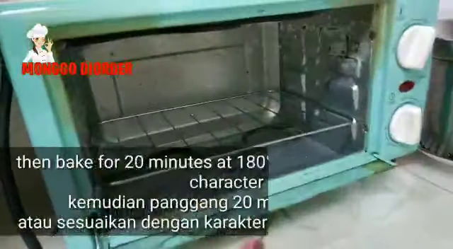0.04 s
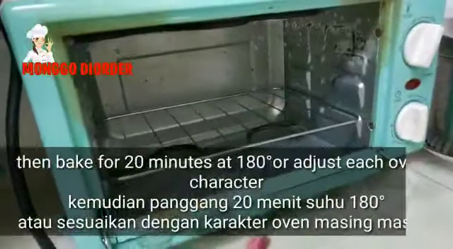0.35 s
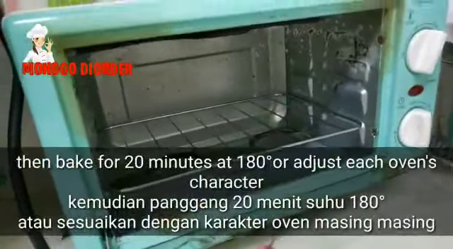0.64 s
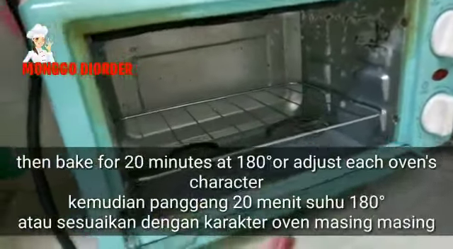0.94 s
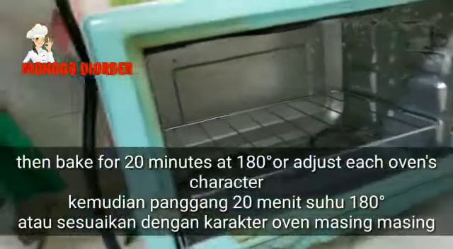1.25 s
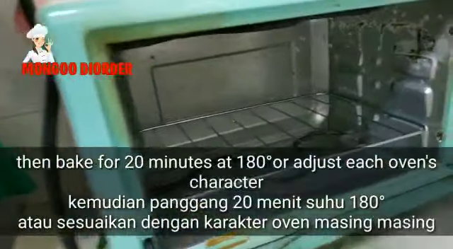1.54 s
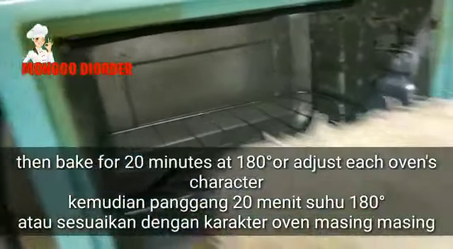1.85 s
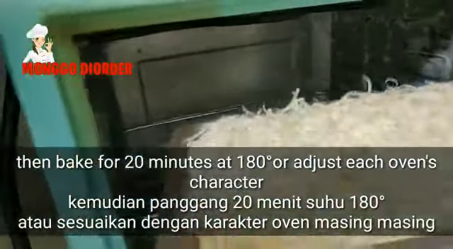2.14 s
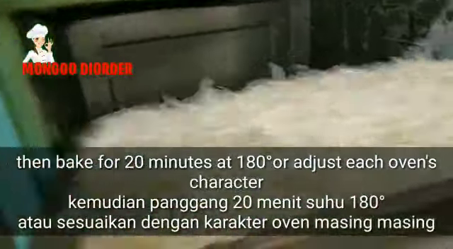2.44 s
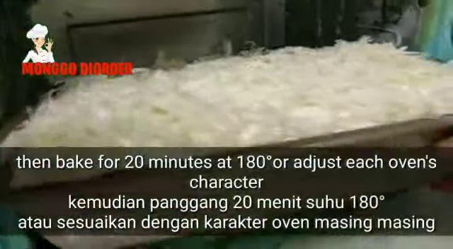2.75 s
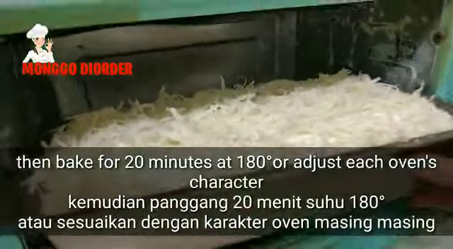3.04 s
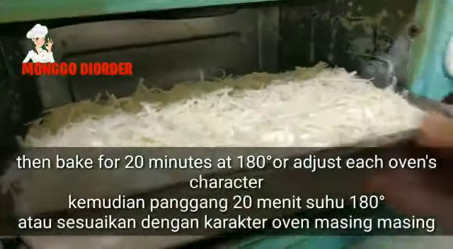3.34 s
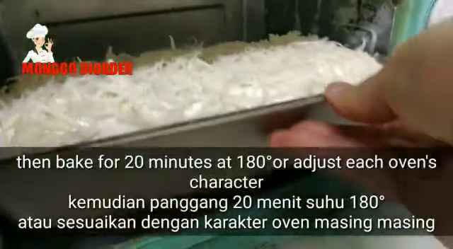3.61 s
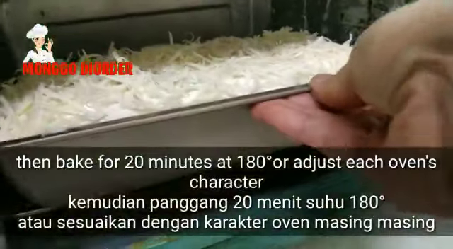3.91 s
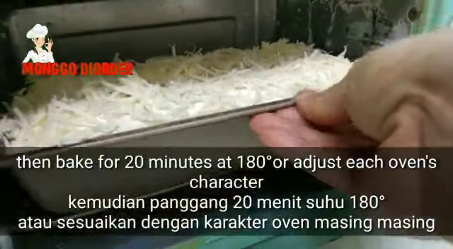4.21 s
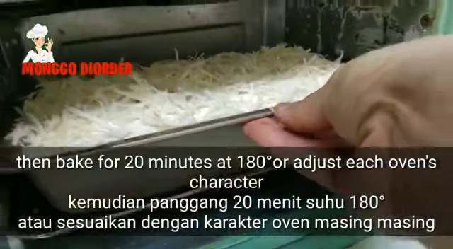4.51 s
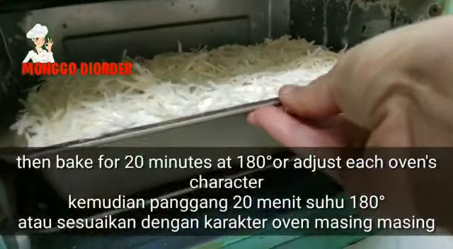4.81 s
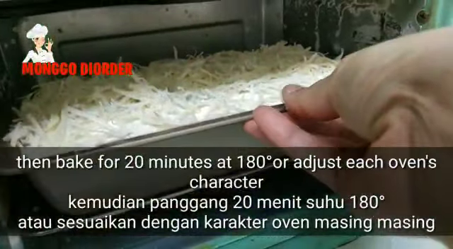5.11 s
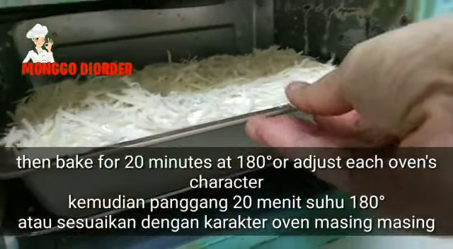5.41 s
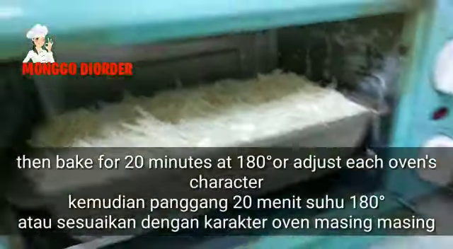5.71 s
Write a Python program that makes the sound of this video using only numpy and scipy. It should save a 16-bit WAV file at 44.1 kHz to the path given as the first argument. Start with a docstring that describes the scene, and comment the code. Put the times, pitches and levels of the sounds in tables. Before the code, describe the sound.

Close to a small oven in a quiet, humming kitchen, thin metal rings as the rack shifts and the glass door clacks. A loaded baking pan then knocks against the sill and scrapes across the wire rack, its base flexing in short low notes. The pan is eased deeper with light taps and soft scrapes, fingers slip off the rim, and the door gives one faint click.

```python
"""A wire rack knocks and slides in a sheet-steel shell, and a glass door clacks: a small toaster oven
stands open in a kitchen, close to a phone's two microphones. A filled metal baking pan bumps the sill
and the rack, scrapes in over the wires and is nudged into place, its floor flexing in short low notes.
Each contact rings the thin metal and the oven cavity; scraping is a run of tiny slips. After the pan's
light taps, fingers brush off the rim and the door gives one faint click, over a low kitchen hum."""
import sys
import numpy as np
from scipy import signal
from scipy.fft import irfft
from scipy.io import wavfile

SR = 44100
rng = np.random.default_rng(int(sys.argv[2]) if len(sys.argv) > 2 else 0)


def transcribe(signal):
    """Save signal, clipped to [-1, 1], as a 16-bit WAV file at the path in sys.argv[1]."""
    frames = np.atleast_2d(signal).T
    limited = np.clip(frames, -1, 1)
    pcm = np.round(limited * 32767).astype(np.int16)
    wavfile.write(sys.argv[1], SR, pcm)


N = 262836
TIME = np.arange(N) / SR
RING_TIME = TIME[:18000]  # the span of one blow's ring
EDGES_HZ = [0, 450, 1200, 3000, 7000, 22050]  # five ranges: thump, body, clack, clang, tick
CAVITY = rng.standard_normal(400)  # uneven heights of the cavity's resonances, the same for every contact

# modes of the oven's steel shell: f/Hz, level/dB, t60/s
OVEN_MODES = [(215, 4.5, 0.53), (245, 9.5, 0.16), (335, -7.5, 0.24), (379, -1, 0.4), (463, 1, 0.63),
              (524, -14, 0.3), (530, 1, 0.27), (730, 8, 0.13), (757, -1.5, 0.45), (1050, 5, 0.15),
              (1332, -2.5, 0.22), (1820, -10, 0.18)]
# modes of the baking pan: f/Hz, level/dB, t60/s
PAN_MODES = [(205, 7.5, 0.28), (253, 1.5, 0.26), (307.5, 6, 0.32), (391, -13, 0.14), (574, 3, 0.18),
             (735, 6.5, 0.33), (862, 4.5, 0.28), (1203, -5, 0.43), (1820, 0, 0.19), (1946, 0, 0.16),
             (2366, -8, 0.14), (3150, -19, 0.13), (5430, -11, 0.13), (6000, -12, 0.12), (6900, -9, 0.12)]


def loading():
    """The pan bumps the sill and the rack and rattles in over the wires in shoves that grow weaker."""
    # the base on the sill: t/s, level/dB, thump/dB, hardness/(dB per range), thump/Hz, panel/Hz, t60/s
    sill_bumps = [(2.3625, -21.5, -3.5, -5.5, 215, 830, 0.076)]
    # the pan on the rack: same columns
    rack_bumps = [(2.106, -36, 1.5, 1.5, 332, 1255, 0.26), (2.114, -30.5, -0.5, -4, 205, 1264, 0.19),
                  (2.506, -31, 8.5, 1.5, 289, 534, 0.082), (2.533, -26, 4, -2.5, 316, 1254, 0.066),
                  (2.55, -30, -1, -6, 205, 735, 0.081), (2.564, -36, 14.5, 3.5, 310, 840, 0.075),
                  (2.576, -33, -5, -4, 303, 1150, 0.05), (2.603, -32, 6, -3.5, 306, 1180, 0.066),
                  (2.626, -27, 1.5, -3.5, 396, 640, 0.25), (2.6865, -29.5, 1.5, -1.5, 191, 496, 0.11),
                  (2.765, -29, 4, -1, 227, 1350, 0.078), (2.802, -29, 5, -3, 215, 1265, 0.13)]
    # shoves that scrape the rim in: t/s, length/s, level/dB, brightness/(dB per range)
    shoves = [(2.508, 0.11, -21.5, 5), (2.69, 0.025, -27.5, -1), (2.775, 0.05, -31, -1),
              (2.85, 0.2, -37, -3)]
    motion = chatter(effort(shoves, sag_db_per_s=27, release_db_per_s=180, dulling=0.53))
    scrape = slide(motion, pan, t60=0.056, slips_per_s=1100, scatter_db=2, thump_db=0.5, modes_db=-18.5)
    grit = rasp(motion)
    clank = knocks(sill_bumps, sill, struck_db=(1, -4), treble_db=(-0.5, -2, -3), gain_db=0.3)
    bumps = knocks(rack_bumps, pan, struck_db=(4, -2), treble_db=(4.5, 2, -2), gain_db=-0.56)
    return clank + bumps + scrape + grit


def rack():
    """The wire rack slides on its runners and knocks against the steel shell."""
    # rack on shell: t/s, level/dB, thump/dB, hardness/(dB per range), thump/Hz, panel/Hz, t60/s
    blows = [(0.002, -29, -8, -2, 215, 760, 0.14), (0.1506, -20.5, -5.5, -0.5, 378, 730, 0.12),
             (0.2205, -22, -5, -2.5, 394, 754, 0.16)]
    # strokes of the sliding rack: t/s, length/s, level/dB, brightness/(dB per range)
    strokes = [(0, 0.28, -25, 0), (.48, 0.16, -38.5, -5.5), (.995, 0.0098, -43, -3.5)]
    motion = effort(strokes, sag_db_per_s=28.5, release_db_per_s=188, dulling=0.43)
    scrape = slide(motion, oven, t60=0.081, slips_per_s=700, scatter_db=4, thump_db=-4.5, modes_db=-17)
    return scrape + knocks(blows, oven, struck_db=(-4, -2.5), treble_db=(-7.5, -7.5, -5.5), gain_db=0.5)


def door_clacks():
    """The glass door meets its stop and settles: each clack is one swing of the pane, then a ring."""
    # clacks: t/s, level/dB, thump/dB, hardness/(dB per range), thump/Hz, panel/Hz, t60/s, slap/dB re level
    clacks = [(0.4499, -23, -9, -1, 245, 785, 0.071, 17), (0.4737, -29.5, -6, 0, 338, 850, 0.14, -2),
              (0.546, -39, -6, -3.5, 288, 520, 0.064, -6), (0.642, -35, -2.5, -3, 244, 992, 0.08, 0.5),
              (1.0422, -28, -3.5, -3, 224, 580, 0.062, 16.5)]
    slaps = sum(swing(t, db + slap_db, hz=850, peak_s=0.00043) for t, db, *_, slap_db in clacks)
    blows = [row[:-1] for row in clacks]
    frame = knocks(blows, door, struck_db=(-3.5, 1), treble_db=(-4, -14.5, -14), gain_db=1.3)
    return small_panel(slaps) + frame


def flexing():
    """The pan's floor bends as its weight shifts; the filling damps each low note quickly."""
    # bends of the loaded floor: t/s, level/dB, f/Hz, time to peak/s
    flexes = [(2.698, -24, 204, 0.024), (2.968, -38, 278, 0.012), (3.015, -32, 282, 0.022),
              (3.106, -21.5, 310, 0.012), (3.178, -34.5, 322, 0.019), (4.025, -34, 287, 0.01),
              (4.555, -36.5, 291, 0.015), (4.615, -38, 323, 0.013)]
    return sum(swing(*row) for row in flexes)


def settling():
    """Small pushes and light taps of the seated pan, then one faint click of the door."""
    # the pan's taps and, in the last row, the door's click:
    # t/s, level/dB, thump/dB, hardness/(dB per range), thump/Hz
    contacts = [(2.985, -44.5, 10, -0.5, 284.5), (3.11, -38.5, 4, -7, 312), (3.351, -42, 10, -7.5, 270),
                (3.374, -65, 26, 2, 203), (3.439, -53.5, 10, 2.5, 261), (3.498, -42, 7, -1, 236),
                (3.556, -57.5, 1, 0.5, 245), (3.659, -49, 8.5, -3.5, 258), (3.962, -41, 2, -6, 262),
                (4.011, -56, 9, 3, 292), (4.029, -47.5, 8.5, -6.5, 277), (4.3534, -36, 2.5, -4.5, 245),
                (4.56, -46.5, 4, -8, 283), (5.2311, -38, -1, -1, 233), (5.789, -60, -12, -1, 253)]
    # pushes that move the pan deeper: t/s, length/s, level/dB, brightness/(dB per range)
    pushes = [(2.99, 0.1, -41, 1), (3.45, 0.11, -44.5, -1.5), (3.67, 0.41, -42.5, -0.5),
              (3.82, 0.012, -37, 0), (3.96, 0.072, -40.5, -2), (4.41, 0.057, -40, -1.5),
              (4.575, 0.022, -45, -0.5)]
    panel_hz, contact_t60 = 536, 0.16
    blows = [(*row, panel_hz, contact_t60) for row in contacts]
    motion = effort(pushes, sag_db_per_s=6, release_db_per_s=159, dulling=0.055)
    creep = slide(motion, seated_pan, t60=0.18, slips_per_s=150, scatter_db=2.5, thump_db=0, modes_db=-24)
    return creep + knocks(blows, seated_pan, struck_db=(1.5, -26), treble_db=(3, -0.5, -2), gain_db=-0.4)


def wire_pings():
    """A rack wire snaps into its slot: a bright tick, then its bunched modes."""
    # snaps: t/s, level/dB, brightness/(dB per octave), ring length/ratio
    snaps = [(0.481, -36.5, 4.5, 1.3), (0.6044, -31, 0.5, 1.1)]
    # bunches of close modes in the wire: f/Hz, width/Hz, level/dB, t60/s
    bunches = [(2860, 150, -6, 0.11), (3700, 95, -14, 0.23), (5250, 110, -2.5, 0.071),
               (6740, 490, -6, 0.09), (7560, 270, -9, 0.11), (9240, 300, 3, 0.078),
               (11000, 550, -7.5, 0.17), (12600, 600, -1, 0.081), (13800, 980, -5, 0.13),
               (15100, 600, -14, .12)]
    out = np.zeros((2, N))
    for t, db, bright, length in snaps:
        ping = sum(undb(mode_db + bright * np.log2(hz / 9000)) * fade(length * t60) * shimmer(hz, width)
                   for hz, width, mode_db, t60 in bunches)
        ping += undb(13) * fade(0.0077) * shimmer(centre_hz=17500, width_hz=6900)  # the tick
        attack_rms = np.std(ping[:, :SR // 50])
        add_at(out, t, undb(db) * ping / attack_rms)
    return out


def wire_rings():
    """Many near-equal wires keep ringing together after a blow."""
    # ringing clusters of wires: t/s, level/dB, f/Hz, width/Hz, t60/s
    clusters = [(.002, -40.5, 3720, 695, 0.93), (.1505, -33.5, 3650, 850, 0.61), (2.114, -51, 4360, 70, 1),
                (2.114, -42, 12400, 700, 0.31), (2.114, -33, 1590, 1490, 0.71),
                (2.113, -38.5, 866, 40, 0.81), (5.2326, -37, 3360, 493, 0.17), (5.786, -51, 2950, 110, 0.1)]
    out = np.zeros((2, N))
    for t, db, hz, width, t60 in clusters:
        add_at(out, t, undb(db) * fade(t60) * shimmer(hz, width))
    return out


def pan(t60, struck=(), modes_db=-13):
    """Response of the filled pan lying on the rack."""
    # the pan's crowd of weak modes: f/Hz, level/dB
    spectrum = [(30, -50), (105, -33), (200, 0), (310, -2.5), (450, -8), (850, -5.5), (1250, -6),
                (1550, -12), (1900, -14), (2800, -15.5), (4000, -18.5), (6500, -26), (11000, -30),
                (16000, -39)]
    modes = [(hz, db + modes_db, decay) for hz, db, decay in PAN_MODES] + list(struck)
    return ring(spectrum, modes, t60, tail_db=-5.5, tail_t60=0.52,
                crack_db=-26, damping=0.83, ripple_db=4.5, rise_s=0.00079)


def sill(t60, struck=(), modes_db=-22):
    """Response of the pan's loaded base on the sill: a short, hollow clank."""
    # the base's crowd of weak modes: f/Hz, level/dB
    spectrum = [(30, -46), (100, -33), (200, -1.5), (310, 3.5), (450, -9), (620, -8.5), (830, 1),
                (1020, -1.5), (1350, -8), (2220, -19), (2520, -19.5), (4020, -20), (5900, -30),
                (11900, -32), (16000, -45)]
    modes = [(hz, db + modes_db, decay) for hz, db, decay in PAN_MODES] + list(struck)
    return ring(spectrum, modes, t60, tail_db=-2.5, tail_t60=0.38,
                crack_db=-17, damping=0.94, ripple_db=1.5, rise_s=0.0005)


def seated_pan(t60, struck=(), modes_db=-27):
    """Lying with its full weight on the rack, the pan is duller and rings less."""
    # the seated pan's crowd of weak modes: f/Hz, level/dB
    spectrum = [(30, -25), (110, -39), (200, 1), (290, 4.5), (370, -6.5), (520, -3), (680, -10),
                (1100, -7.5), (2000, -14), (2500, -16.5), (3400, -17.5), (4700, -25.5), (6500, -26.5),
                (9000, -21), (16000, -33)]
    modes = [(hz, db + modes_db, decay) for hz, db, decay in PAN_MODES] + list(struck)
    return ring(spectrum, modes, t60, tail_db=-19.5, tail_t60=0.92,
                crack_db=-38, damping=0.88, ripple_db=4.5, rise_s=0.00046)


def oven(t60, struck=(), modes_db=-15):
    """Response of the oven shell; a well damped contact also shortens its modes and its tail."""
    # the shell's crowd of weak modes: f/Hz, level/dB
    spectrum = [(30, -47), (110, -9), (215, -3.5), (400, -3), (620, -7.5), (740, -7.5), (1100, -9.5),
                (1400, -12), (1900, -12.5), (2800, -18.5), (3800, -15.5), (5400, -22.5), (8700, -19.5),
                (11500, -30), (16000, -28.5)]
    tail_t60 = 3.94 * t60
    modes = [(hz, db + modes_db, min(decay, tail_t60)) for hz, db, decay in OVEN_MODES] + list(struck)
    return ring(spectrum, modes, t60, tail_db=-7.5, tail_t60=tail_t60,
                crack_db=-4, damping=0.8, ripple_db=2.5, rise_s=0.00029)


def door(t60, struck=(), modes_db=-22):
    """Response of the framed glass door, with the shell ringing faintly behind it."""
    # the door's crowd of weak modes: f/Hz, level/dB
    spectrum = [(30, -50), (100, -19), (195, 6), (450, 2), (580, 5), (690, -20), (900, 3.5), (1170, -13.5),
                (1760, -16), (2300, -24), (3000, -26.5), (3900, -30), (4470, -28.5), (6560, -36),
                (12700, -34), (16000, -53)]
    modes = [(hz, db + modes_db, min(decay, 3 * t60)) for hz, db, decay in OVEN_MODES] + list(struck)
    return ring(spectrum, modes, t60, tail_db=-14, tail_t60=5.6 * t60,
                crack_db=-6, damping=1, ripple_db=2, rise_s=0.00059)


def knocks(blows, body, struck_db, treble_db, gain_db):
    """Blows on a body: weight sets the thump, hardness tilts the treble, the spot hit picks two modes."""
    thump_mode_db, panel_mode_db = struck_db
    out = np.zeros((2, N))
    for t, db, thump_db, hardness, thump_hz, panel_hz, t60 in blows:
        ranges = body(t60, [(thump_hz, thump_mode_db, 1.03 * t60), (panel_hz, panel_mode_db, t60)])
        attack_rms = np.sqrt(np.mean(ranges[..., :SR // 33] ** 2, axis=(1, 2)))
        tilted_db = np.array(treble_db) + hardness * np.arange(1, 4)  # clack, clang, tick
        gains = undb(db + np.array([thump_db, 0, *tilted_db])) / attack_rms
        add_at(out, t, np.tensordot(gains, ranges, 1))
    return undb(gain_db) * out


def effort(strokes, sag_db_per_s, release_db_per_s, dulling, attack_s=0.0047):
    """Level and brightness of a slide in dB: each stroke bites, slows and lets go, duller as it weakens."""
    db, bright = np.full(N, -np.inf), np.zeros(N)
    for t, length, peak_db, peak_bright in strokes:
        age = TIME - t
        rise = 20 * np.minimum(age / attack_s, 0)
        fall = sag_db_per_s * np.maximum(age, 0) + release_db_per_s * np.maximum(age - length, 0)
        stroke_db = peak_db + rise - fall
        bright = np.where(stroke_db > db, peak_bright - dulling * np.minimum(fall, 20), bright)
        db = np.maximum(db, stroke_db)
    return db, bright


def chatter(motion, hops_per_s=75, jolt_db=8, jolt_s=0.0049):
    """The rim hops from wire to wire: each landing is a sudden jolt that fades before the next."""
    db, bright = motion
    gaps, sizes = rng.uniform(.5, 1.5, (1000, 2)).T
    landings = (np.cumsum(gaps) - gaps[0]) / hops_per_s
    last = np.searchsorted(landings, TIME, side="right") - 1
    jolts = undb(jolt_db * sizes[last] * np.exp((landings[last] - TIME) / jolt_s))
    return db + 20 * np.log10(unit(jolts)), bright


def slide(motion, body, t60, slips_per_s, scatter_db, thump_db, modes_db, points=3, contact_s=0.022):
    """Metal catches and slips: uneven clicks ring the body, differently at each point of contact."""
    db, bright = motion
    moving = np.flatnonzero(db > -80)
    span = np.arange(moving[0], moving[-1])
    sizes = rng.choice([-1, 1], len(span)) * undb(scatter_db * (2 * rng.random(len(span)) - 1))
    slips = unit((rng.random(len(span)) < slips_per_s / SR) * sizes)
    contact = (span / SR / contact_s + rng.random(len(span))).astype(int) % points
    forces = [slips * undb(db[span] + bright[span] * (k - 1.5) + thump_db * (k == 0))
              for k in range(len(EDGES_HZ) - 1)]
    out = np.zeros((2, N + len(RING_TIME)))
    for point in range(points):
        ranges = body(t60, modes_db=modes_db)
        ranges /= np.sqrt(np.sum(ranges ** 2) / 2)  # unit energy per microphone
        for force, response in zip(forces, ranges):
            sound = signal.fftconvolve((force * (contact == point))[None], response, axes=1)
            out[:, span[0]:span[0] + sound.shape[1]] += sound
    return out[:, :N]


def rasp(motion, centre_hz=4930, width_hz=13000, relative_db=-13):
    """Under pressure the rim grinds on the wires: grit too dense to hear as single slips."""
    slide_db, _ = motion
    hz = np.fft.rfftfreq(N, 1 / SR)
    band = bell_curve(hz, centre_hz, width_hz) * undb(5.8 * ripple(hz))
    return unit(irfft(field(hz) * band, N)) * undb(slide_db + relative_db)


def ring(spectrum, modes, t60, tail_db, tail_t60, crack_db, damping, ripple_db, rise_s):
    """A struck panel in five ranges: a crack, a quick crowd of modes, the cavity's tail, single modes."""
    hz = np.fft.rfftfreq(len(RING_TIME), 1 / SR)
    crowd = field(hz) * colour(spectrum, hz) * undb(ripple_db * ripple(hz) * np.minimum(hz / 1500, 1))
    crowd /= np.std(irfft(crowd))
    lines, line_hz = tones(modes), np.array(modes)[:, 0]
    ranges = []
    for k, (lo, hi) in enumerate(zip(EDGES_HZ, EDGES_HZ[1:])):
        shorter = damping ** (k - 1)  # with damping under 1, higher ranges die sooner
        crack = k * undb(crack_db) * fade(0.004)
        envelope = fade(t60 * shorter) + undb(tail_db) * fade(tail_t60 * shorter) + crack
        swell = 1 - np.exp(-RING_TIME * (k + .5) / rise_s)  # slow bending waves bring the lows later
        noise = irfft(crowd * ((hz >= lo) & (hz < hi)))
        pitched = lines[(line_hz >= lo) & (line_hz < hi)].sum(axis=0)
        ranges.append(swell * (envelope * noise + pitched))
    return small_panel(np.array(ranges))


def tones(modes, spread_hz=1300, detune=0.0068, scatter_db=3):
    """Decaying modes; the place of contact varies their strength, pitch and phase at each microphone."""
    out = []
    for (hz, db, t60), (size, shift, *phase) in zip(modes, rng.standard_normal((len(modes), 4))):
        mic_phase = np.array(phase)[:, None] * min(hz / spread_hz, 2)
        angle = 2 * np.pi * hz * (1 + detune * shift) * RING_TIME + mic_phase
        out.append(undb(db + scatter_db * size) * fade(t60) * np.sin(angle))
    return np.array(out)


def swing(t, db, hz, peak_s):
    """A panel swells into motion at one pitch and dies away; db is the crest of its envelope."""
    age = np.clip(TIME - t, 0, 20 * peak_s)
    envelope = (age / peak_s * np.exp(1 - age / peak_s)) ** 2
    return -undb(db) * envelope * np.sin(2 * np.pi * hz * age)


def shimmer(centre_hz, width_hz):
    """Many close modes beating together: a band of noise at both microphones, rms 1."""
    hz = np.fft.rfftfreq(len(RING_TIME), 1 / SR)
    return unit(irfft(field(hz) * bell_curve(hz, centre_hz, width_hz)))


def ripple(hz, spacing_hz=110):
    """Uneven resonances along frequency: half set by the steel cavity, half by the place of contact."""
    heights = (CAVITY + rng.standard_normal(len(CAVITY))) / np.sqrt(2)
    return np.interp(hz / spacing_hz, np.arange(len(heights)), heights)


def small_panel(x, corner_hz=170, leak_db=-17):
    """A small sheet radiates little under its lowest mode."""
    highpass = signal.butter(4, corner_hz, "high", fs=SR, output="sos")
    return signal.sosfilt(highpass, x) + undb(leak_db) * x


def fingers():
    """Skin slips off the rim with a faint hiss."""
    # rise and fall of the brush: t/s, level/dB
    brush = [(5.6, -90), (5.625, -47.5), (5.67, -51), (5.72, -69)]
    highpass = signal.butter(1, 8000, "high", fs=SR, output="sos")
    hiss = signal.sosfilt(highpass, rng.standard_normal((2, N)))
    return unit(hiss) * undb(curve(brush)) * (TIME < brush[-1][0])


def kitchen():
    """Room tone of the kitchen, with a wavering, fading hum at the resonances of the open cavity."""
    # spectrum of the room tone: f/Hz, level/dB
    air_spectrum = [(18, -89), (30, -51), (64, -50), (84, -34), (170, -12.5), (266, -11.5), (303, -7.5),
                    (345, -13.5), (404, -14.5), (486, -14.5), (526, -10.5), (666, -17), (780, -16.5),
                    (1060, -19), (1400, -22.5), (2000, -27), (3980, -37.5), (14800, -41.5), (16000, -37)]
    # course of the room tone: t/s, level/dB
    air_level = [(0, -45), (1.2, -47), (2, -47), (3.3, -46), (4.9, -46.5), (5.96, -47.5)]
    # cavity resonances: f/Hz, wander/Hz, relative level/dB
    hum_tones = [(302, 4.75, 6.5), (416, 13.6, -2.5), (524, 10.9, -2)]
    # course of the hum: t/s, level/dB
    hum_level = [(0, -36.5), (.8, -43), (1.4, -47.5), (2, -50.5), (3.3, -53.5), (4.8, -55.5), (5.96, -70)]
    hz = np.fft.rfftfreq(N, 1 / SR)
    air = unit(irfft(field(hz, alike_hz=700) * colour(air_spectrum, hz), N))
    hum = sum(undb(db + 2 * walk(12)) * np.sin(2 * np.pi * np.cumsum(f + wander * walk(25)) / SR)
              for f, wander, db in hum_tones)
    return air * undb(curve(air_level)) + unit(hum) * undb(curve(hum_level))


def field(hz, alike_hz=760, bass_side=0.21):
    """Random spectrum at two microphones: long waves reach both alike, short ones do not."""
    mid, side = np.exp(2j * np.pi * rng.random((2, len(hz))))
    apart = np.clip(bass_side + (hz / alike_hz) ** 2 / 2, 0, 1)
    return (mid + apart * side * np.array([[1], [-1]])) / np.sqrt(1 + apart ** 2)


def colour(spectrum, hz):
    """Gain at any frequency from a few (Hz, dB) points."""
    knots, db = np.transpose(spectrum)
    return undb(np.interp(np.log(hz + 1), np.log(knots), db))


def bell_curve(hz, centre_hz, width_hz):
    """Gain of a Gaussian band."""
    return np.exp(-2 * ((hz - centre_hz) / width_hz) ** 2)


def fade(t60):
    """Free decay of a struck thing."""
    return np.exp(-np.log(1000) * RING_TIME / max(t60, .005))


def walk(turns_per_s):
    """Random drift with a spread near 1."""
    return np.interp(TIME * turns_per_s, np.arange(400), rng.standard_normal(400))


def curve(rows):
    """Points (s, value) joined by straight lines in time."""
    return np.interp(TIME, *np.transpose(rows))


def add_at(out, t, sound):
    """Mix a sound in from t seconds on."""
    start = int(t * SR)
    out[:, start:start + sound.shape[1]] += sound[:, :N - start]


def undb(db):
    """Decibels to gain."""
    return 10 ** (np.asarray(db) / 20)


def unit(x):
    """Scale to rms 1."""
    return x / np.sqrt(np.mean(x ** 2) + 1e-20)


def scene():
    """At close range the oven is made ready, the pan goes in and settles, and the door clicks faintly."""
    making_ready = rack() + door_clacks() + wire_pings() + wire_rings()
    return making_ready + loading() + flexing() + settling() + fingers() + kitchen()


def record(dry):
    """Sound reaches the left microphone a little later; the phone cuts the top."""
    lag_s, top_hz = 0.0002, 15500
    left = np.pad(dry[0], (int(lag_s * SR), 0))[:N]
    lowpass = signal.ellip(8, .2, 70, top_hz, fs=SR, output="sos")
    return signal.sosfilt(lowpass, np.array([left, dry[1]]))


dry = scene()
out = record(dry)
transcribe(out)
```